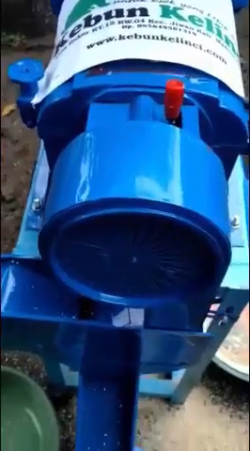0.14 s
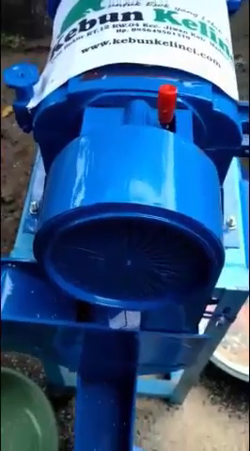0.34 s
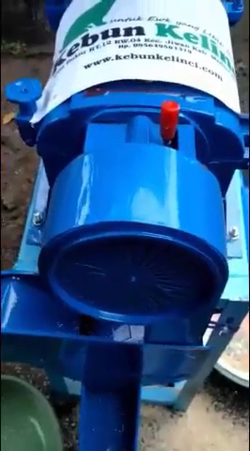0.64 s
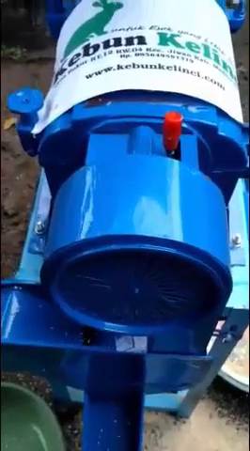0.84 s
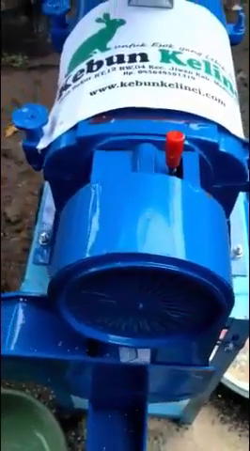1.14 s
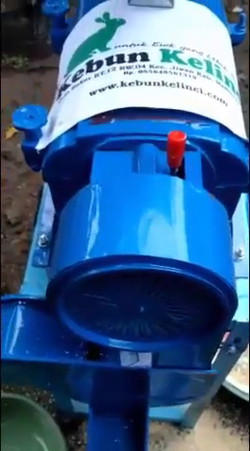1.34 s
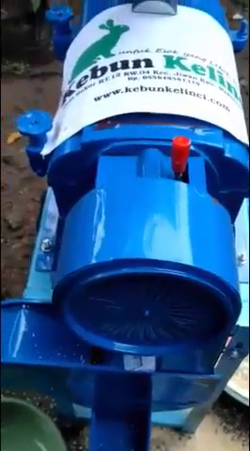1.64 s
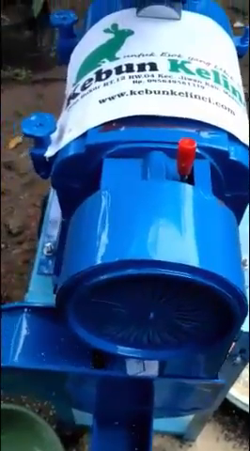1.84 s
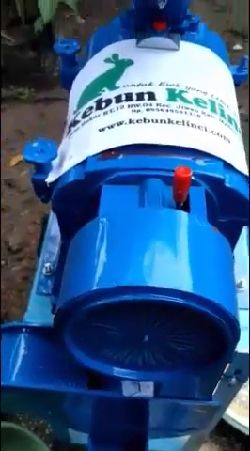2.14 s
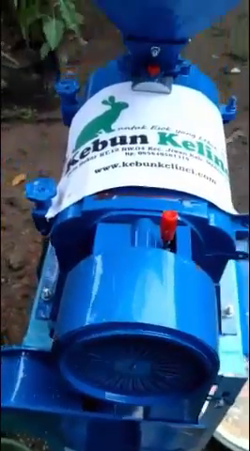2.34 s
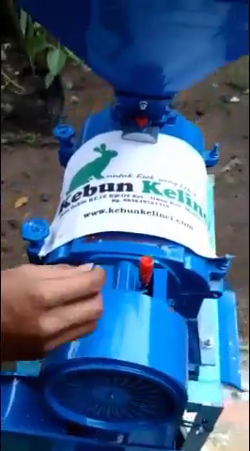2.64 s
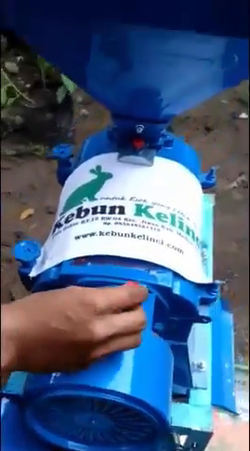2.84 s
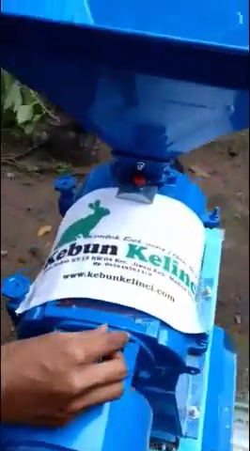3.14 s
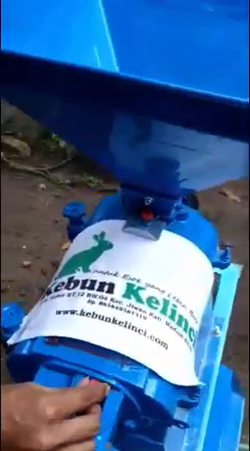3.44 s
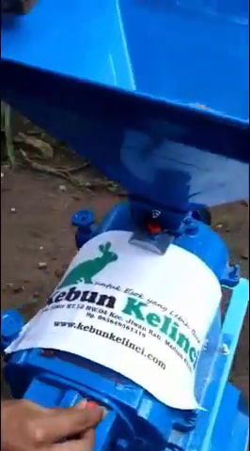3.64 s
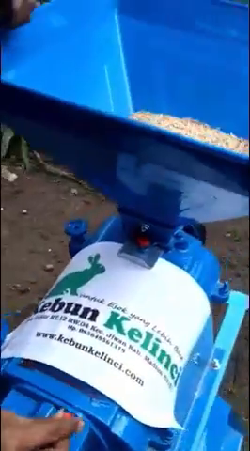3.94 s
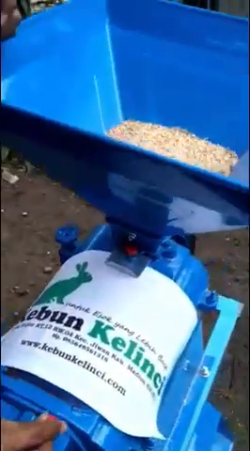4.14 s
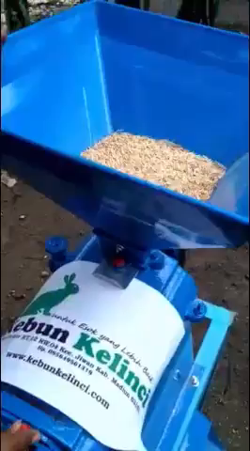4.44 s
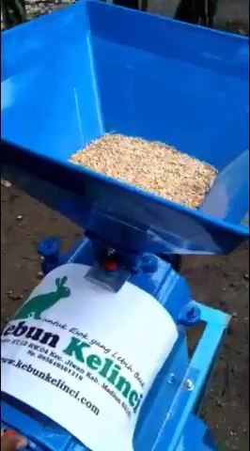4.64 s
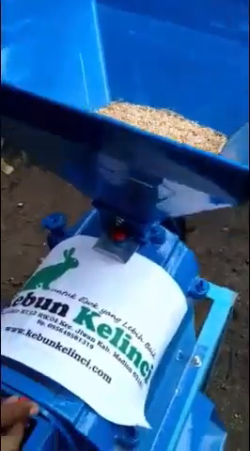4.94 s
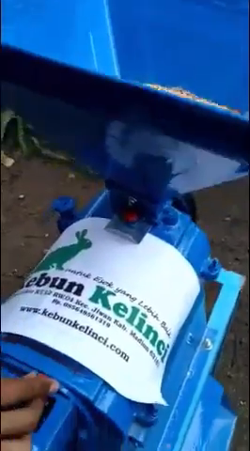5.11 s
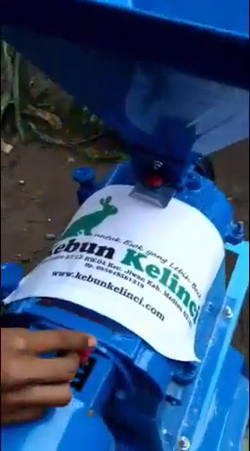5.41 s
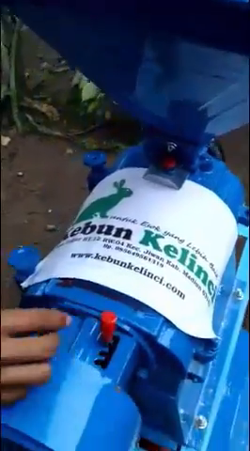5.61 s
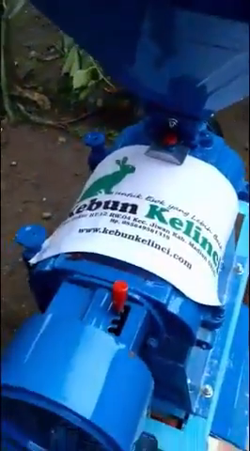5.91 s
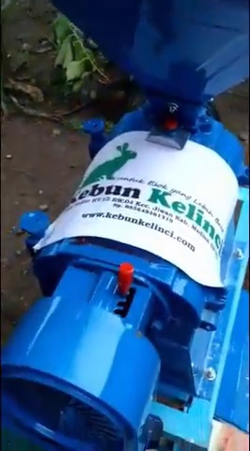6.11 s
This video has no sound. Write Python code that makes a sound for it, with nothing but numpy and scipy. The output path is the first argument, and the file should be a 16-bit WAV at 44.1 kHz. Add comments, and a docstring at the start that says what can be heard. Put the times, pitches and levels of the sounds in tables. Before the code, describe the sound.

Loud, unbroken machine clatter close up: rapid muffled engine firing, broad blower and roller roar, dense kernel hiss, and faint low breeze.

```python
"""Outdoors, close to a small rice mill driven by a one-cylinder engine at a nearly steady speed.
Each firing thumps through the muffler as a sum of orders of the firing rate and shakes the frame panels.
Noise bands make the roar of blower and rollers; random knocks of grains ring sheet-metal modes.
Valve clacks, thin whines, near echoes and a low breeze with one gust join in.
A hand-held pair of microphones wanders a little between the blower and the hopper."""
import sys
import numpy as np
from scipy import signal
from scipy.fft import rfft, irfft, next_fast_len
from scipy.io import wavfile

SR = 44100
rng = np.random.default_rng(int(sys.argv[2]) if len(sys.argv) > 2 else 0)


def generate_wav(sig):
    """Save sig (samples, or channels by samples) to the path in sys.argv[1] as 16-bit PCM at SR."""
    pcm = np.round(np.clip(np.atleast_2d(sig).T, -1, 1) * 32767).astype(np.int16)
    wavfile.write(sys.argv[1], SR, pcm)


N = 276507

# Engine speed. Each row: time in seconds, firings per second.
FIRING_RATE = [(0, 29.125), (1.04, 29.129), (2.09, 29.106), (3.13, 29.087), (4.18, 29.095), (6.27, 29.089)]
# How far the mill leans to one microphone. Each row: frequency in Hz, left minus right in dB.
LEFT_LEAN = [(240, 0), (350, 1), (500, 0), (900, -1), (1400, 1.5), (1750, .5), (2300, 5), (2900, 1.5),
             (4000, 1.3), (4600, 0)]
LEFT_RIGHT = np.array([[1], [-1]])


def from_db(db):
    """Decibels to gain."""
    return 10 ** (np.asarray(db) / 20)


def rms_one(x):
    """Scale to unit rms."""
    return x / np.sqrt(np.mean(x ** 2) + 1e-20)


def in_time(rows):
    """Each column of a curve table, sample by sample."""
    s, *columns = np.transpose(rows)
    return [np.interp(np.arange(N) / SR, s, c) for c in columns]


def at_hz(points, hz):
    """Read a table on a log-frequency axis."""
    point_hz, values = np.array(points).T
    return np.interp(np.log(np.maximum(hz, 1)), np.log(point_hz), values)


def band_pass(x, low_hz, high_hz):
    """Keep the range between two frequencies."""
    return signal.sosfilt(signal.butter(2, [low_hz, high_hz], "band", fs=SR, output="sos"), x)


def drift(rate_hz):
    """Slow chance of rms 1: noise at every 40th sample through a double one-pole low-pass."""
    r = np.exp(-80 * np.pi * rate_hz / SR)
    noise = rng.standard_normal(N // 40 + 2002)
    slow = signal.lfilter([1], [1, -2 * r, r * r], noise)[2000:]   # skip the filter's start
    return np.interp(np.arange(N) / 40, np.arange(len(slow)), rms_one(slow))


def ring(x, hz, width_hz):
    """A two-pole resonance: narrower modes ring longer."""
    r = np.exp(-np.pi * np.clip(width_hz, 10, 900) / SR)
    return signal.lfilter([0, 1], [1, -2 * r * np.cos(2 * np.pi * hz / SR), r * r], x + 1e-18)


def causal_pulse(db_on_grid):
    """The pulse that rings out soonest for a given magnitude (folded cepstrum)."""
    cepstrum = irfft(db_on_grid * np.log(10) / 20)
    half = len(cepstrum) // 2
    cepstrum[1:half] *= 2
    cepstrum[half + 1:] = 0
    return irfft(np.exp(rfft(cepstrum)))[:half]


def crank():
    """Firings done so far, sample by sample: the running sum of the firing rate."""
    first_firing_s = .0194
    per_s, = in_time(FIRING_RATE)
    return np.cumsum(per_s) / SR - first_firing_s * per_s[0]


def muffler_phase(order, hz):
    """Phase in radians: chamber resonance on the lowest orders, outlet delay on the highest."""
    chamber_hz, chamber_q = 88, 2.3
    outlet_hz, outlet_q = 650, 3
    turn_late = .15   # the shake at the crank's turning rate (order 2) trails by this share of a cycle
    lead = 2 * np.arctan2(hz * chamber_hz / chamber_q, hz ** 2 - chamber_hz ** 2)
    lead -= np.arctan2(hz * outlet_hz / outlet_q, outlet_hz ** 2 - hz ** 2)
    return lead - 4 * np.pi * turn_late * (order == 2)


def engine(panel_db, height):
    """Orders build a suction pulse per firing, shaped by muffler phase; panels add modes, some late."""
    # Muffler response. Each row: multiple of the firing rate, level in dB from low, level in dB from high;
    # exhaust_db is added to both levels.
    exhaust_orders = [(2, -10, -10), (3, -12, -12), (4, -.5, -1), (5, 2.2, 2), (6, -7, -3), (7, -22, -22),
                      (8, -16, -12), (9, -11, -12), (10, -22, -30), (11, -22, -16), (12, -14, -22),
                      (13, -16, -13), (14, -14, -16), (15, -14, -10), (16, -15, -14), (17, -11, -16),
                      (18, -12, -12), (19, -24, -20), (20, -19, -16), (22, -18, -14), (23, -20, -24)]
    # Frame panels shaken by each firing. Each row: frequency in Hz, width in Hz, delay in seconds
    # (negative is early), left minus right in dB.
    frame_panels = [(233, 14, 0, 0), (291, 14, -.0003, 9), (365, 80, .0056, 12), (400, 60, -.0005, 2)]
    exhaust_db = -26
    uneven_db, hunt_db = .7, .3   # spread from firing to firing; swell and sink over a few turns
    # each order wavers on its own: base level, change per multiple, phase in its own turns
    waver_db, waver_step_db, slip_turns = 1.1, -.02, .03

    turns = crank()
    firing = np.arange(-1, int(turns[-1]) + 2)
    firing_gain = from_db(uneven_db * rng.standard_normal(len(firing)))
    strength = np.interp(turns, firing, firing_gain) * from_db(hunt_db * drift(4))
    exhaust, panels = 0, np.zeros((len(frame_panels), N))
    for k, low_db, high_db in exhaust_orders:
        order, hz = int(k), k * FIRING_RATE[0][1]
        wave = -np.exp(2j * np.pi * (order * turns + slip_turns * drift(2.5)))
        wave = wave * from_db((waver_db + waver_step_db * order) * drift(3.5))
        db = exhaust_db + low_db + (high_db - low_db) * np.clip(height, 0, 1)
        exhaust = exhaust + from_db(db) * (wave * np.exp(1j * muffler_phase(order, hz))).real
        for m, (mode_hz, width_hz, delay_s, _) in enumerate(frame_panels):
            if abs(hz - mode_hz) < 2 * width_hz:
                delayed = (wave * np.exp(-2j * np.pi * hz * delay_s)).real
                panels[m] += delayed / (1 + (2 * (hz - mode_hz) / width_hz) ** 2)
    shaken = 0
    for row, db, panel in zip(frame_panels, panel_db, panels):
        shaken = shaken + from_db(db + row[3] / 2 * LEFT_RIGHT) * panel
    return np.sqrt(2) * strength * (exhaust + shaken)


def valves():
    """Exhaust puff and valve gear: short uneven noise bursts at fixed points of each cycle."""
    # Each row: share of the cycle, kick level in dB over the mill, lower edge in Hz, upper edge in Hz.
    clacks = [(-.02, -7, 400, 900), (0, -6, 1800, 4000), (.06, -2, 900, 1800), (.36, -6, 900, 1600),
              (.51, -4, 1600, 3600), (.53, -7, 400, 900), (.66, -5, 900, 3000)]
    decay_s, uneven_db = .0025, 2.5
    turns, out = crank(), 0
    for share, db, low_hz, high_hz in clacks:
        kicks, at = np.zeros(N), np.flatnonzero(np.diff(np.floor(turns - share)))
        kicks[at] = from_db(db + uneven_db * rng.standard_normal(len(at)))
        burst = signal.lfilter([1], [1, -np.exp(-1 / (decay_s * SR))], kicks)
        shared, own = rng.standard_normal((2, N))
        noise = band_pass(shared + .5 * own * LEFT_RIGHT, low_hz, high_hz)
        out = out + burst * rms_one(noise)
    return out


def whine(height):
    """Thin fin and gear tones locked to the crank, wavering, out of step at the two microphones."""
    # Each row: multiple of the firing rate, level in dB rms from low, level in dB rms from high.
    tones = [(32, -44, -47), (33, -44, -43), (37, -46, -44), (38, -44, -44), (39, -44, -47), (44, -39, -46)]
    wander_turns, waver_db = .15, 2.5   # rms slip in phase; scale of the level wavering
    turns, out = crank(), 0
    for k, low_db, high_db in tones:
        own_waver = np.array([drift(7.1), drift(7.1)])
        db = low_db + (high_db - low_db) * height + waver_db * (drift(.93) + .5 * own_waver)
        phase_turns = int(k) * turns + wander_turns * drift(2.6) + rng.random((2, 1))
        out = out + from_db(db) * np.sqrt(2) * np.sin(2 * np.pi * phase_turns)
    return out


def band_noise(spectrum, patchy_db, slow_db):
    """Flickering bands of stereo noise with likeness and lean, as lows and highs; middle range at rms 1."""
    # How alike the microphones hear the roar. Each row: frequency in Hz, left-right likeness.
    likeness = [(60, .9995), (190, .9995), (235, .98), (265, .85), (300, .6), (400, .15), (500, .55),
                (620, .84), (760, .7), (900, .3), (1100, .05), (11000, .05)]
    treble_flicker_db = 1.0   # takes the place of slow_db in the treble bands
    size = next_fast_len(N)
    hz = np.fft.rfftfreq(size, 1 / SR)
    mid, side = rfft(rng.standard_normal((2, size)))
    alike = np.clip(at_hz(likeness, hz), 0, 1)
    both = np.sqrt(1 + alike) * mid + np.sqrt(1 - alike) * side * LEFT_RIGHT
    both *= from_db(at_hz(spectrum, hz) + at_hz(LEFT_LEAN, hz) / 2 * LEFT_RIGHT)
    half_octaves = 2 * np.log2(np.maximum(hz, 25) / 25)
    lows, highs = 0, 0
    for k in range(19):
        band = irfft(both * np.clip(1 - abs(half_octaves - k), 0, 1), size)[:, :N]   # triangles overlap
        flicker_db = slow_db if k < 14 else treble_flicker_db
        band *= from_db(patchy_db * drift(42) + flicker_db * drift(9.9))
        if k < 14:
            lows = lows + band
        else:   # centred on 3200 Hz and up
            highs = highs + band
    middle = band_pass(lows.mean(0), 700, 3000)
    return lows / middle.std(), highs / middle.std()


def grains():
    """Dense random knocks of kernels ring the casing modes, heard differently at each microphone."""
    # Sheet-metal modes. Each row: frequency in Hz, width in Hz, relative level in dB.
    casing = [(910, 140, -0.5), (1460, 440, 0), (1960, 220, -1), (2350, 200, -3), (2930, 160, -5),
              (4000, 500, 0), (5400, 210, -5.5)]
    grains_per_s = 3400   # at each microphone, shared out among the modes
    out = np.zeros((2, N))
    for hz, width_hz, db in casing:
        knocks = rng.random((2, N)) < grains_per_s / len(casing) / SR
        count = knocks.sum()
        sizes = np.zeros((2, N))
        size_db = 3.0 * np.minimum(rng.exponential(1, count), 5)
        sizes[knocks] = from_db(size_db) * rng.choice([-1, 1], count)
        lean = from_db(at_hz(LEFT_LEAN, hz) / 2 * LEFT_RIGHT)
        out += from_db(db) * lean * rms_one(ring(np.diff(sizes, prepend=0), hz, width_hz))
    return rms_one(out)


def surfaces(x, height):
    """Short echoes off near surfaces comb the roar; their paths change as the microphones move."""
    # Each row: delay in ms from low, delay in ms from high, lag of left behind right in ms from low,
    # the same lag in ms from high, level in dB.
    near_surfaces = [(2.6, 3.3, -0.12, 0.44, -11), (4.3, 3.6, 0.14, 0.49, -10.5),
                     (6.7, 7.5, -0.21, 0.36, -10.5), (9.1, 8.0, 0.32, -0.217, -12),
                     (12.4, 13.1, -0.23, 0.39, -12.5)]
    tremor_ms, return_hz = .081, 930   # the hand shifts each path a little; only shorter waves come back
    short = signal.sosfilt(signal.butter(2, return_hz, "high", fs=SR, output="sos"), x.mean(0))
    now, out = np.arange(N), 0
    for low_ms, high_ms, low_lag_ms, high_lag_ms, db in near_surfaces:
        path_ms = low_ms + (high_ms - low_ms) * height + tremor_ms * drift(.63)
        lag_ms = low_lag_ms + (high_lag_ms - low_lag_ms) * height
        left = np.interp(now - (path_ms + lag_ms / 2) * SR / 1000, now, short)
        right = np.interp(now - (path_ms - lag_ms / 2) * SR / 1000, now, short)
        out = out + from_db(db) * np.array([left, right])
    return out


def in_step(x, height):
    """Narrow ranges reach the microphones in step or opposed: common and opposed parts are reweighted."""
    # Each row: frequency in Hz, width in Hz, likeness at height 0, at .4, at .6, at 1.
    step_ranges = [(660, 200, 0, .3, .35, 0), (1220, 110, -.2, 0, -.3, -.9), (1500, 160, 0, -.9, -.2, -.1)]
    common, opposed = (x[0] + x[1]) / 2, (x[0] - x[1]) / 2
    for hz, width_hz, *likeness in step_ranges:
        alike = np.clip(np.interp(height, [0, .4, .6, 1], likeness), -.95, .95)
        b, a = signal.butter(1, [hz - width_hz / 2, hz + width_hz / 2], "band", fs=SR)
        common = common + (np.sqrt(1 + alike) - 1) * signal.lfilter(b, a, common)
        opposed = opposed + (np.sqrt(1 - alike) - 1) * signal.lfilter(b, a, opposed)
    return np.array([common + opposed, common - opposed])


def wind():
    """Low buffeting, alike at both microphones, swells in one gust.

    With it goes soft uneven low noise, 105-200 Hz, different left and right, swelling with the gust."""
    breeze_db = -46
    gust_s, gust_db, rise_s, fall_s = 4.3, 8, 1.9, .94   # peak time, swell over the breeze, rise, fall
    low_noise_db = -14   # against the buffeting, outside the gust and before its own drift
    gust = [(gust_s - rise_s, breeze_db), (gust_s, breeze_db + gust_db), (gust_s + fall_s, breeze_db)]
    level_db, = in_time(gust)
    lumps = band_pass(rng.standard_normal(N + SR), 25, 60)[SR:]
    low_noise = band_pass(rng.standard_normal((2, N)), 105, 200)
    low_noise_gain = from_db(low_noise_db + level_db - breeze_db + 5 * drift(3))   # swells twice over
    return from_db(level_db) * (rms_one(lumps) + low_noise_gain * rms_one(low_noise))


def scene():
    """Engine, mill and wind, as heard from where the microphones are."""
    # The wandering microphones. Each row: time in seconds, height from blower 0 to hopper 1,
    # level of the mill in dB.
    place = [(0, 0, -22.5), (2, 0.04, -22.5), (2.6, .35, -23), (3.1, 0.547, -24), (3.7, 1, -23),
             (4.6, 0.99, -23), (5.5, 0.692, -23.5), (6.27, .6, -22.5)]
    # Each frame panel. Each row: level in dB from low by the blower, level in dB from up by the hopper.
    panel_levels = [(-32, -52), (-41, -58), (-36, -40.5), (-52, -35)]
    # Blower and rollers. Each row: frequency in Hz, relative level in dB per Hz.
    roar_spectrum = [(20, -25), (45, -14), (75, -8.5), (125, -2.5), (205, -6.5), (300, 0), (380, 2),
                     (470, 0.5), (620, -1.5), (780, -2.5), (1200, -2), (2300, -3.5), (3300, -10),
                     (4700, -14), (7000, -17), (11000, -17)]
    treble_follows = 2.4   # the roar's treble swings this many times as far as the mill's level
    hopper_treble_db = 1.5   # and gains this much from blower to hopper

    height, mill_db = in_time(place)
    panel_db = [low + (high - low) * np.clip(height, 0, 1) for low, high in panel_levels]
    treble_db = (treble_follows - 1) * (mill_db - mill_db.mean()) + hopper_treble_db * (height - .5)
    # the frame jolts twice per firing: the roar swells slightly, loose kernels rattle harder
    jolt = np.cos(4 * np.pi * (crank() - .03))
    lows, highs = band_noise(roar_spectrum, patchy_db=.5, slow_db=.45)
    roar = from_db(.2 * jolt) * (lows + from_db(treble_db) * highs)
    rattle = from_db(-4.5 + .65 * jolt) * grains() + valves()
    mill = roar + rattle
    mill = from_db(mill_db) * in_step(mill + surfaces(mill, height), height)
    return engine(panel_db, height) + whine(height) + mill + wind()


def record(dry):
    """The microphone ports colour the treble, peaks are rounded, the top is cut."""
    # A dip and a resonance above it. Each row: frequency in Hz, response in dB.
    port = [(6000, -1), (6900, -3), (7800, -18), (8200, -19), (8800, -6.5), (9400, -5), (10400, 2.5),
            (11000, -3)]
    cutoff_hz = 10870
    hz = np.fft.rfftfreq(2 ** 11, 1 / SR)
    coloured = signal.fftconvolve(dry, causal_pulse(at_hz(port, hz))[None], axes=1)[:, :N]
    rounded = 1.5 * np.tanh(coloured / 1.5)
    return signal.sosfilt(signal.ellip(14, .5, 70, cutoff_hz, fs=SR, output="sos"), rounded)


dry = scene()
out = record(dry)
generate_wav(out)
```